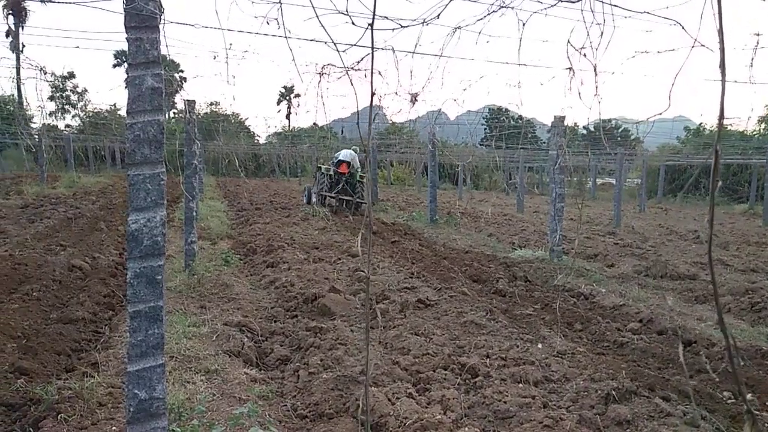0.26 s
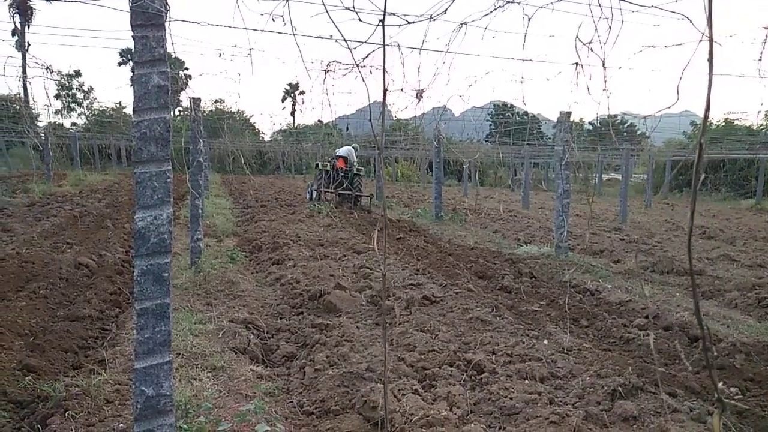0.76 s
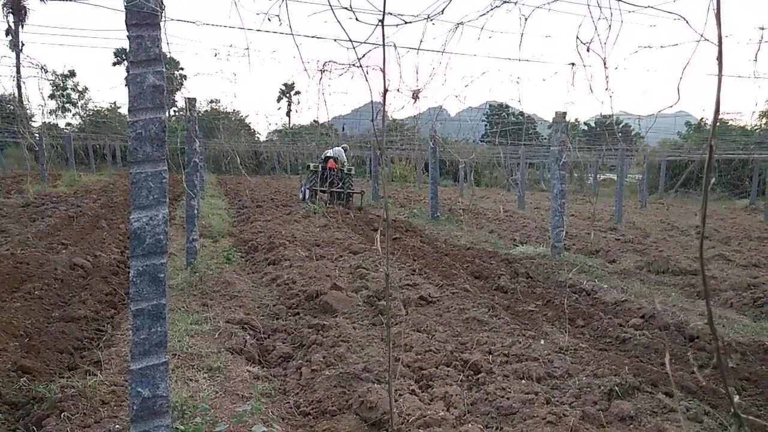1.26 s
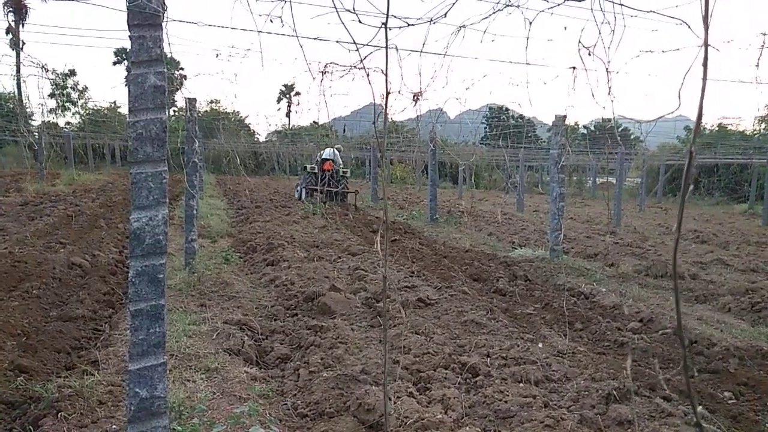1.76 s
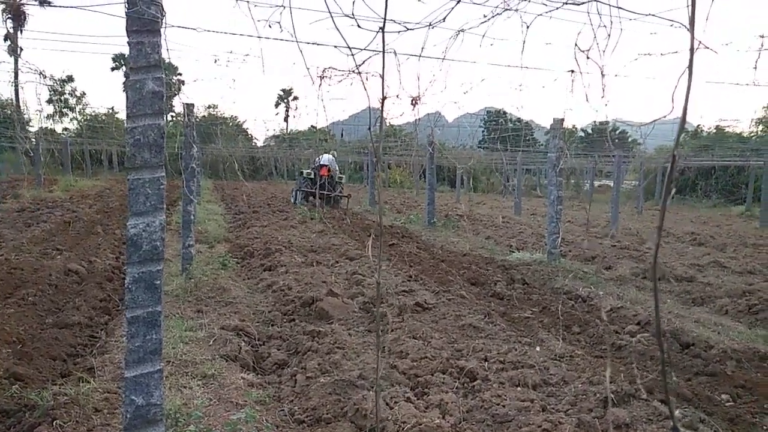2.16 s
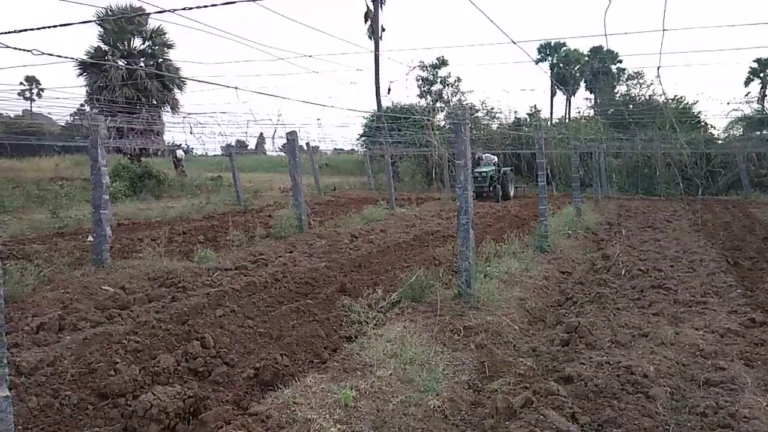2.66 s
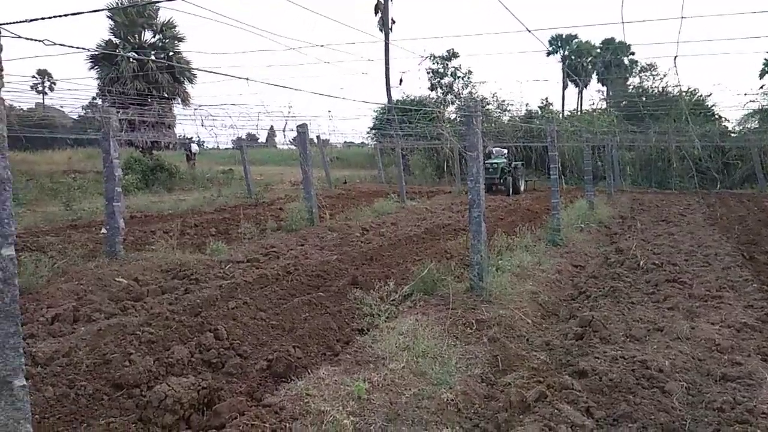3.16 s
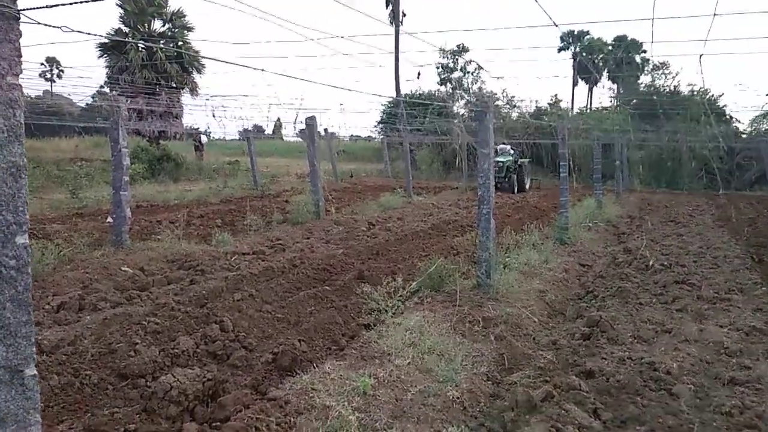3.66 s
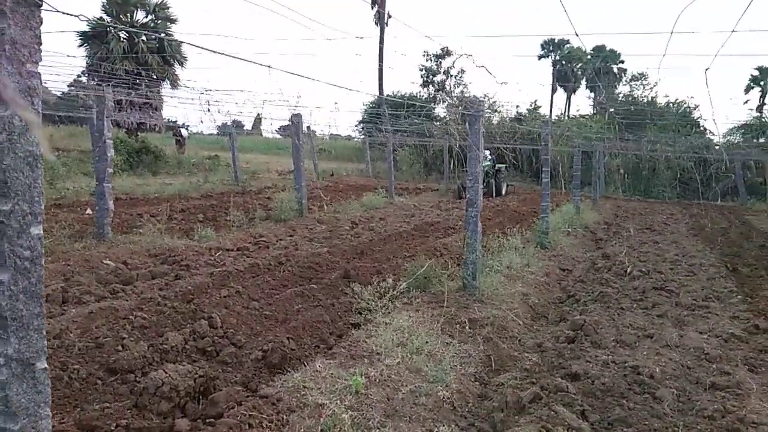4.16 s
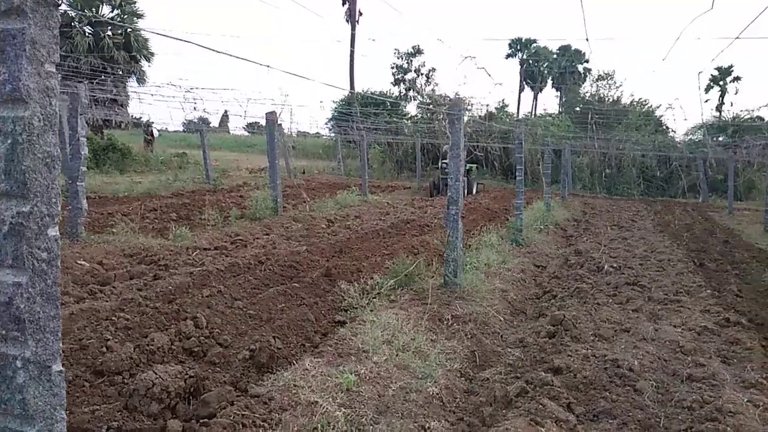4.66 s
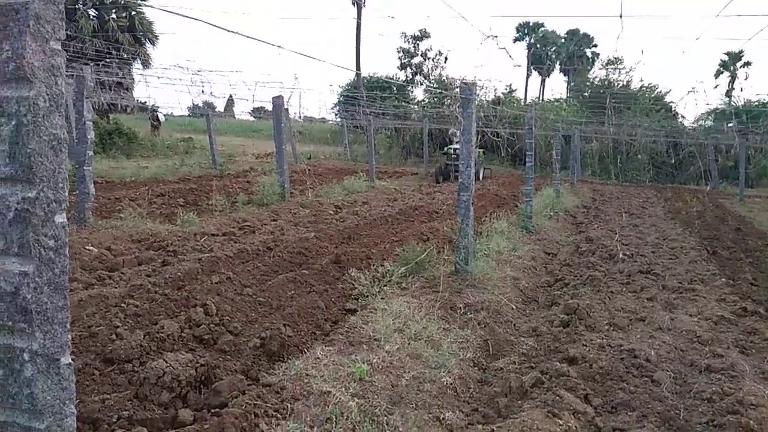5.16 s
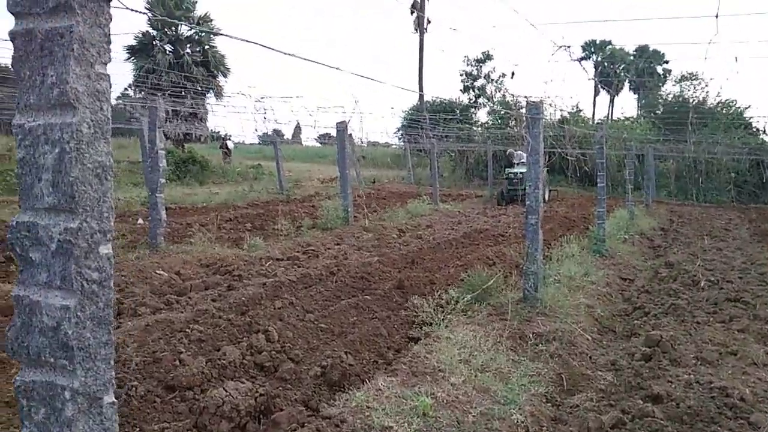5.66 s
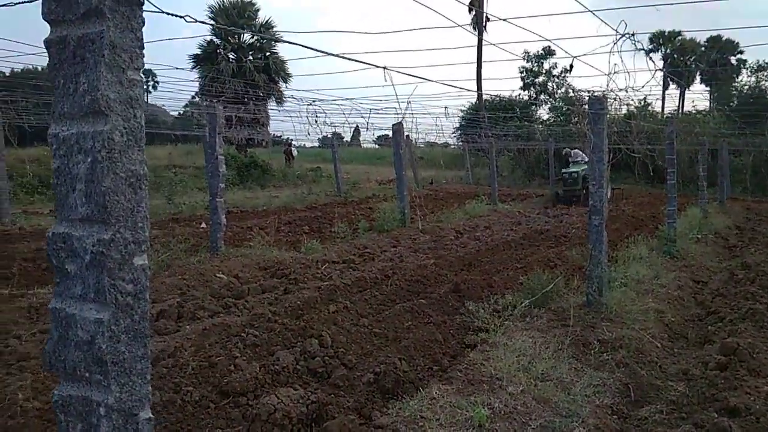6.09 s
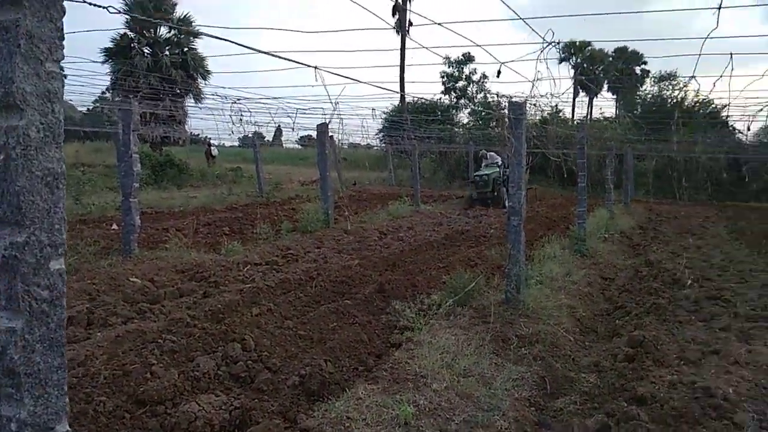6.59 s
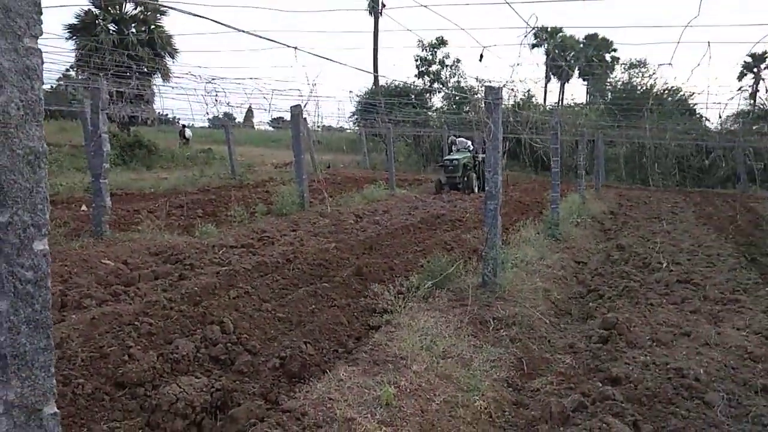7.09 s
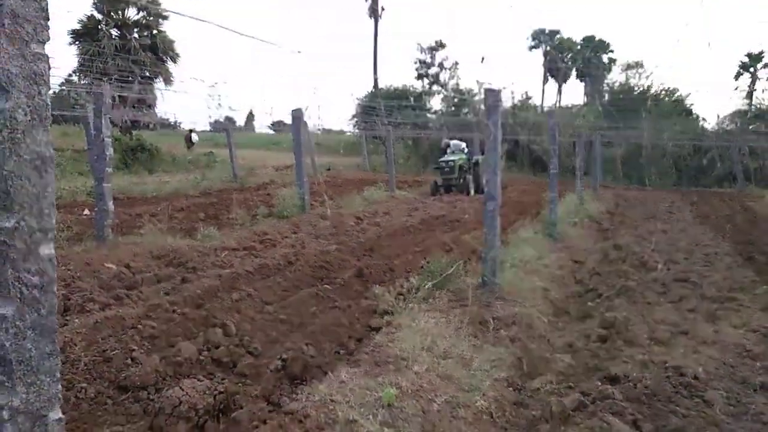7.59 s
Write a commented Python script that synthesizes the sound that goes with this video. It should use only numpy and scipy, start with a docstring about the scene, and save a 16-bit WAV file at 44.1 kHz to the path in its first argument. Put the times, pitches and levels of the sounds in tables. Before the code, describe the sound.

From 0 to 2 s a small diesel tractor putters at a distance in an open field: a fast, even beat of about 27 pulses a second, low thuds with light, dry cracks and mid-pitched metal clatter, the rasp swelling slightly as speed sags. At about 2.05 s the listening place cuts abruptly. The engine is suddenly far louder and slower, revving up from about 19 to 24 pulses a second, boomy, knocking on alternate turns, with bright spits and clanks, heaviest near 2.3 s. Around 3.2 s it drops sharply and keeps chugging much more quietly. A low bump sounds at 4.4 s, another at 4.7 s, and hissy metallic spits run from 4.6 to 5.5 s, with a sharp clack at 5.0 s. A smaller run comes near 6.4 s; ringing clanks continue from 6.7 s to the end near 7.8 s. Stereo leans left, with faint air and little reverberation.

```python
"""Small diesel tractor at work

A tractor pulls a cultivator across a field, heard from one spot and, after 2 s, from another.
Every crank turn sums low orders into a thud and gates noise into a bright rasp; part of a turn later
the engine block rings with a knock, hardest on firing turns, and noise bursts crack and clatter.
When the soil drags the crank down, the rasp grows; at the second spot sharp noise bursts spit in runs.
Short decaying rings make the clanks, bumps and clacks, over faint open air of coloured noise."""
import sys
import numpy as np
from scipy import signal
from scipy.fft import rfft, irfft, next_fast_len
from scipy.io import wavfile
from scipy.ndimage import uniform_filter1d

SR = 44100
rng = np.random.default_rng(int(sys.argv[2]) if len(sys.argv) > 2 else 0)


def store_wav(level_fs):
    """Save 16-bit WAV to argv[1]."""
    pcm = np.round(np.clip(np.atleast_2d(level_fs), -1, 1) * 32767)
    wavfile.write(sys.argv[1], SR, pcm.T.astype(np.int16))


N = 345303
T = np.arange(N) / SR
CUT_S = 2.045  # when the listening place moves to the second spot


def amp(db):
    """Decibels to gain."""
    return 10 ** (np.asarray(db) / 20)


def evened(x):
    """Scales to rms 1."""
    return x / np.sqrt(np.mean(x ** 2) + 1e-20)


def curve(rows, axis=1):
    """One column of a table, joined by straight lines in time."""
    columns = np.transpose(rows)
    return np.interp(T, columns[0], columns[axis])


def read(points, hz):
    """A spectrum, joined by straight lines over log frequency."""
    f, value = np.transpose(points)
    return np.interp(np.log(hz + 1), np.log(f + 1), value)


def panned(lean_db):
    """Left and right gains whose mean is 1, for a lean of left minus right in dB."""
    ratio = amp(np.atleast_1d(lean_db))
    return 2 * np.array([ratio, np.ones_like(ratio)]) / (1 + ratio)


def add(mix, start_s, sound):
    """Mixes a sound in at a time, cut off at the end of the mix."""
    part = mix[max(round(start_s * SR), 0):][:len(sound)]
    part += sound[:len(part)]


def wobble(hz):
    """Random wander of rms 1: a new value hz times a second, joined by straight lines."""
    values = rng.standard_normal(N // 8)
    return evened(np.interp(T * hz, np.arange(N // 8), values))


# How alike the sound is at the two microphones. Each row: frequency in Hz, likeness (held to 0..1).
LIKENESS = [(60, 6.5), (250, -0.4), (700, 3.5), (1400, 0.78), (2500, 0.58), (5000, 0.39), (15000, -0.14)]


def noise(colour, lean, gate=1):
    """Noise, let through by a gate and then coloured, partly alike at the two microphones."""
    size = next_fast_len(N + 4096, True)
    hz = np.fft.rfftfreq(size, 1 / SR)
    shared, other = rfft(rng.standard_normal((2, N)) * gate, size)
    same = np.clip(read(LIKENESS, hz), 0, 1)
    second = same * shared + np.sqrt(1 - same ** 2) * other
    pair = np.array([shared, second]) * panned(read(lean, hz))
    x = irfft(pair * amp(read(colour, hz)), size)[:, :N]
    return x / x.mean(0).std()


def swell(u):
    """A soft attack that peaks at 1 when u is 2, then dies."""
    u = np.maximum(u, 0)
    return (u / 2) ** 2 * np.exp(2 - u)


def ring(hz, swell_s):
    """One short ring of random phase, fullest after two swell times."""
    t = np.arange(0, 20 * swell_s, 1 / SR)
    return swell(t / swell_s) * np.sin(2 * np.pi * (hz * t + rng.random()))


def crank(speed, start):
    """Turns of the crankshaft so far: its speed summed over time."""
    return start + np.cumsum(curve(speed)) / SR


GOVERNOR_LAG_S, LOAD_BEND = 0.14, 0.7
FULL_SAG = 3.2  # turns a second below free speed


def load(speed, free_speed):
    """How hard the engine pulls, 0 to 1: soil drags the crank down and the governor adds fuel later."""
    sag = free_speed - np.interp(T - GOVERNOR_LAG_S, *np.transpose(speed))
    return np.clip(sag / FULL_SAG, 0, 1) ** LOAD_BEND


def strokes(turns, idle_db, scatter_db):
    """Strength of each turn: firing and idle turns alternate, idle ones offset by idle_db, all scattered."""
    index = np.floor(turns).astype(int)
    scatter = scatter_db * rng.standard_normal(256)[index % 256]
    return amp(idle_db * (index % 2) + scatter)


def strike(turns, rise, fall):
    """Once a turn, a rounded rise and a slower fall that runs on under the next, both in turns."""
    ages = turns % 1 + np.arange(3)[:, None]
    return ((1 - np.exp(-(ages / rise) ** 2)) * np.exp(-ages / fall)).sum(0)


def thud(turns, orders, level_db, lean_db, rebound, waver_db):
    """The low orders line up into one pressure dip a turn; a weaker dip follows 0.42 turn later."""
    def dip(phase):
        return -sum(amp(db) * np.cos(2 * np.pi * order * phase) for order, db in orders)
    pulse = dip(turns) + rebound * dip(turns - .42)
    return evened(pulse) * amp(level_db + waver_db * wobble(31.5)) * panned(lean_db)


def rasp(turns, colour, lean, bed, fall, again):
    """A bright noise rasp once a turn, and a softer one nearly half a turn later."""
    force = strokes(turns, 0, scatter_db=1.2)
    grain = amp(1.8 * wobble(1500))
    second = swell((turns - .36) % 1 / .085)
    shake = strike(turns, rise=0.099, fall=fall) + again * second
    return noise(colour, lean, (bed + force * shake) * grain)


# What the engine block rings with at each knock.
# Each row: pitch in Hz, relative level in dB, swell time in seconds.
BLOCK_MODES = [(749.7, 18.5, 0.0026), (843, 12, 0.0037), (920, 3.5, 0.0013), (1026, 1, 0.0084)]
BOUNCE_S, BOUNCE_DB = 0.0097, -6  # typical delay and level of the bounce after a blow
KNOCK_SCATTER_DB = .7


def knock(turns, modes, idle_db, detune, scatter_db):
    """Once a turn a blow rings the modes, idle turns offset by idle_db; a lighter bounce follows."""
    out = np.zeros(N)
    force = strokes(turns, idle_db, scatter_db)
    for at in np.flatnonzero(np.diff(np.floor(turns))) + 1:
        for hz, db, swell_s in modes:
            pitch, size, late, bounce = rng.standard_normal(4)
            pitch_hz = hz * (1 + detune * pitch)
            gain = force[at] * amp(db + .5 * size)
            bounce_gain = gain * amp(BOUNCE_DB + bounce)
            add(out, at / SR, gain * ring(pitch_hz, swell_s))
            add(out, at / SR + BOUNCE_S * np.exp(0.2474 * late), bounce_gain * ring(pitch_hz, swell_s))
    return evened(out)


# Spells in which a panel rings along with the knock.
# Each row: start in seconds, end in seconds, pitch in Hz, level in dB.
PANELS = [(0.0, 1.7, 1544, -77.5), (1.35, 1.54, 1498, -70), (1.44, 1.43, 758, -70), (2.3, 3, 1044, -64),
          (2.3, 3.25, 1555, -60.5), (4.2, 5.2, 1357, -76), (5.61, 6.22, 1080, -64.5),
          (5.8, 5.96, 1274, -70), (6.6, 7.8, 1602, -68), (6.6, 7.8, 2310, -70.5)]
PANEL_FADE_DB_PER_S, PANEL_SCATTER_DB = 62, 2
CLANK_DB, CLANK_SWELL_S, PANEL_SWELL_S = 10, 0.0012, 0.007  # short clank against the longer ring


def panels(turns):
    """Each panel rings once a turn, fading in and out around a spell: a short clank and a longer ring."""
    out = np.zeros(N)
    for start, end, hz, db in PANELS:
        outside_s = abs(T - np.clip(T, start, end))
        modes = [(hz, CLANK_DB, CLANK_SWELL_S), (hz, 0, PANEL_SWELL_S)]
        rings = knock(turns - .39, modes, idle_db=0.5, detune=0.0302, scatter_db=PANEL_SCATTER_DB)
        out += amp(db - PANEL_FADE_DB_PER_S * outside_s) * rings
    return out


SCATTER_DB, SCATTER_T60_S = -11, 0.19


def field(x, lean_db):
    """The direct sound, and a short scatter from the clods and posts that differs at each microphone."""
    t = T[:SR // 4]
    tail = rng.standard_normal((2, len(t))) * amp(-60 * t / SCATTER_T60_S) * (t > .006)
    tail /= np.linalg.norm(tail, axis=1, keepdims=True)
    scatter = signal.fftconvolve(x[None], tail, axes=1)[:, :N]
    return (x + amp(SCATTER_DB) * scatter) * panned(lean_db)


CRACK_SWELL_TURNS = .075


def crack(turns, colour, lean, idle_db):
    """Each blow opens with a round, wide crack of noise; idle turns are offset by idle_db."""
    burst = swell((turns % 1) / CRACK_SWELL_TURNS) * strokes(turns, idle_db, scatter_db=1.2)
    return noise(colour, lean, burst)


def clatter(turns, colour, lean, fall, bed, idle_db):
    """Loose metal chatters after each blow: grainy noise that dies away under the next."""
    burst = strike(turns, rise=.17, fall=fall) * strokes(turns, idle_db, scatter_db=1)
    grain = amp(1.66 * wobble(500))
    return noise(colour, lean, (bed + burst) * grain)


# Crank speed at the first spot. Each row: time in seconds, speed in turns a second.
SPEED_A = [(0.0, 26.69), (0.67, 27.31), (0.97, 26.62), (1.18, 27.8), (1.5, 25.84), (1.73, 27.77),
           (2.045, 26.84)]
# Make-up of the thud at the first spot. Each row: multiple of crank speed, relative level in dB.
THUD_A = [(1, -5), (2, -4), (3, 0), (4, 1), (5, -6), (6, -22), (7, -22), (8, -18), (9, -26), (10, -23),
          (11, -29), (12, -28)]
# Colours of clatter, rasp and crack at the first spot. Each row: frequency in Hz, relative dB per Hz.
CLATTER_A = [(120, -7), (220, -17), (360, 1.5), (450, -26), (610, 7.5), (680, -2), (740, 8.5), (950, -3),
             (1190, 9), (1290, -5), (1550, 2), (2200, -2), (2800, -4), (3300, -15.5), (3620, -6.5),
             (3950, -15.5), (5000, -19), (6200, -22), (9000, -35)]
RASP_COLOUR_A = [(3500, -7.5), (6200, -16.5), (7100, -4), (8200, -4.5), (9000, 2), (10100, 1.5),
                 (11200, -6), (12900, -27), (15800, -42)]
CRACK_COLOUR_A = [(400, -25), (700, 3), (1100, -2.5), (1500, 9), (1900, 3), (2500, 3), (3100, -4),
                  (3600, -7), (4500, -17), (9000, -30)]
# Lean between the microphones at the first spot. Each row: frequency in Hz, left minus right in dB.
LEAN_A = [(60, 3.5), (1200, 5), (1900, -3), (3000, 3), (4300, 17.5), (5300, 3), (8000, -1), (10500, 13),
          (13000, -2.5)]
FREE_SPEED_A = 27.65  # turns a second
THUD_A_DB, KNOCK_A_DB, CLATTER_A_DB, RASP_A_DB = -54.5, -78.5, -65, -72.5
CRACK_A_DB = -8  # against the clatter
LOAD_THUD_A_DB, LOAD_CLATTER_A_DB, LOAD_RASP_A_DB = 3, 0.5, 7.5  # what full load adds


def first_spot():
    """The engine runs fast, with a light, quick crack and clatter on every turn."""
    turns, pull = crank(SPEED_A, -.111), load(SPEED_A, FREE_SPEED_A)
    thud_db = THUD_A_DB + LOAD_THUD_A_DB * pull
    clatter_db = CLATTER_A_DB + LOAD_CLATTER_A_DB * pull
    rasp_db = RASP_A_DB + LOAD_RASP_A_DB * pull
    thuds = thud(turns, THUD_A, thud_db, lean_db=5.5, rebound=0.43, waver_db=0.5)
    rasps = rasp(turns + 0.28, RASP_COLOUR_A, LEAN_A, bed=0.47, fall=0.16, again=0.27)
    knocks = amp(KNOCK_A_DB) * knock(turns - .28, BLOCK_MODES, idle_db=-4.0, detune=0.062,
                                     scatter_db=KNOCK_SCATTER_DB)
    rings = field(knocks + panels(turns + 0.1212), lean_db=3.0)
    cracks = crack(turns - .28, CRACK_COLOUR_A, LEAN_A, idle_db=0.5)
    clatters = clatter(turns - .22, CLATTER_A, LEAN_A, fall=1.0, bed=0.55, idle_db=0.0)
    return (thuds + amp(rasp_db) * rasps + rings
            + amp(clatter_db + CRACK_A_DB) * cracks + amp(clatter_db) * clatters)


# Levels at the second spot: loud for a second, then it drops and stays nearly even.
# Each row: time in seconds, thud level in dB, clatter level in dB before load.
LOUDNESS_B = [(2.05, -40.5, -56.5), (2.15, -41, -51.5), (2.32, -34.5, -46.5), (2.5, -39, -51),
              (3.2, -37.5, -50), (3.27, -49.5, -61), (3.42, -54.5, -62), (4.69, -53.5, -58.5),
              (4.72, -44.5, -55.5), (4.75, -53.5, -57), (5.5, -53.5, -60.5), (6.6, -52.5, -58.5),
              (7.83, -52.5, -58)]


def loudness():
    """How loud the thud is at the second spot, 0 to 1."""
    loud_db = curve(LOUDNESS_B)
    return (loud_db - loud_db.min()) / np.ptp(loud_db)


# Colour of the open air. Each row: frequency in Hz, relative dB per Hz.
AIR = [(10, -0.5), (30, 4.5), (80, -6), (160, -4.5), (300, -17), (450, -23), (800, -53), (2000, -19.5),
       (4500, -54), (11000, -34), (16000, -45)]


def air():
    """A faint noise wash that rises and falls with the engine's loudness."""
    loud_db = np.where(T < CUT_S, THUD_A_DB, curve(LOUDNESS_B))
    return noise(AIR, LEAN_A) * amp(loud_db - 12.5 + 2.0 * wobble(6.8))


# Single hard clanks: mostly loose metal, plus some extra hard knocks of the engine near 800 Hz. # Each row:
# start in seconds, level in dB, pitch in Hz.
CLANKS = [(0.054, -60, 1470), (0.13, -54.5, 1490), (0.209, -58, 1636), (0.281, -58, 614),
          (0.353, -63, 1490), (0.788, -63, 1380), (1.168, -58, 1500), (1.456, -60, 1440), (1.5, -57, 1560),
          (1.577, -57.5, 1490), (2.174, -46, 1610), (2.273, -40, 900), (2.9, -44, 1480), (3.07, -43, 1444),
          (3.591, -59, 1400), (3.927, -61, 1450), (4.173, -54, 1350), (4.383, -48, 790), (4.514, -55, 1350),
          (4.604, -50, 1365), (4.874, -49, 1450), (4.961, -53, 1310), (5.048, -56, 1370), (5.09, -49, 770),
          (5.136, -55, 1380), (5.224, -53, 1360), (6.287, -49.5, 890), (6.679, -47.5, 1510),
          (6.717, -50, 1510), (6.932, -63, 2250), (7.185, -50.5, 2420), (7.186, -49, 1540),
          (7.267, -48, 2390), (7.271, -49.5, 1540), (7.353, -48.5, 1520), (7.394, -51.5, 803),
          (7.436, -54.5, 2340), (7.525, -61, 2300), (7.696, -55, 2400), (7.777, -45, 790),
          (7.778, -53, 2390)]
# What a clank rings with. Each row: multiple of its pitch, relative level in dB, swell time in seconds.
CLANK_MODES = [(1, 1.5, 0.0016), (.86, -13.5, 0.0019), (1.15, -14, 0.00077)]


def clanks():
    """Single hard blows: each rings a close cluster of modes and bounces once."""
    out = np.zeros(N)
    for start_s, db, hz in CLANKS:
        for ratio, mode_db, swell_s in CLANK_MODES:
            add(out, start_s, amp(db + mode_db) * ring(hz * ratio, swell_s))
            add(out, start_s + BOUNCE_S, amp(db + mode_db + BOUNCE_DB) * ring(hz * ratio, swell_s))
    return out


# Crank speed at the second spot. Each row: time in seconds, speed in turns a second.
SPEED_B = [(2.045, 19.39), (2.4, 24.51), (2.76, 23.12), (3.15, 23.01), (3.91, 24.1), (4.36, 23.62),
           (4.62, 21.9), (5.02, 23.09), (5.2, 22.69), (5.94, 24.29), (6.3, 22.64), (6.65, 23.88),
           (6.8, 23.02), (7.1, 24.02), (7.48, 23.12), (7.83, 24.37)]
# Make-up of the thud at the second spot. Each row: multiple of crank speed, relative level in dB.
THUD_B = [(1, -8.5), (2, -4.5), (3, 0), (4, .5), (5, -5.5), (6, -2.5), (7, -23), (8, -25), (9, -32),
          (10, -31), (11, -34), (12, -33)]
# Colours at the second spot: clatter, rasp, the lower body the rasp gains while loud, the crack that
# opens each blow, and the higher clack of the idle turns. Each row: frequency in Hz, relative dB per Hz.
CLATTER_B = [(150, 1), (280, -10.5), (480, -16.5), (600, -4.5), (760, 0.5), (1020, 1.5), (1200, -8),
             (1550, 5), (1950, -7), (2350, -6), (2700, -11.5), (3400, -8.5), (4200, -16), (5200, -11.5),
             (6500, -16), (9000, -32)]
RASP_COLOUR_B = [(2500, -37), (4500, -26), (6200, -20.5), (7300, -8.5), (8300, -9.5), (9300, -5),
                 (9900, -2.5), (10700, -6), (11600, -16.5), (13000, -17.5), (14500, -52), (16000, -73)]
RASP_BODY = [(1500, -13), (2700, -9.5), (3400, 4), (3800, 6), (4200, 0), (4800, 0.5), (5500, -6),
             (6200, -32), (9000, -30)]
CRACK_COLOUR_B = [(400, -25), (750, 10.5), (1000, 10), (1200, 2), (1550, 2.5), (1900, 2), (2350, 0.5),
                  (2700, -2), (3400, -2.5), (4300, -13.5), (6000, -11), (10000, -20)]
CLACK_COLOUR = [(900, -19), (1350, 8), (1600, 4.5), (1950, -6.5), (2380, 6), (2750, -28), (3500, -13),
                (6000, -30)]
# Levels of the knock and of the clack. Each row: time in seconds, level in dB.
KNOCK_B = [(2.05, -53), (2.43, -56), (2.55, -59.5), (2.7, -57.5), (2.77, -50), (3.12, -53.5), (3.2, -51.5),
           (3.46, -62), (3.88, -67), (4.2, -60), (4.56, -63), (4.74, -59), (4.83, -61), (5.05, -58),
           (5.36, -60), (5.45, -62), (6.2, -73.5), (6.55, -61.5), (6.8, -66), (6.98, -59.5), (7.3, -67.5),
           (7.8, -59)]
CLACK_B = [(2.05, -67.5), (2.6, -57), (3.17, -62.5), (3.35, -73), (4.3, -74.5), (4.9, -68.5), (5.6, -75.5),
           (6.3, -73.5), (6.7, -70), (7.25, -69.5), (7.8, -67)]
# Lean between the microphones at the second spot. Each row: frequency in Hz, left minus right in dB.
LEAN_B = [(60, 14), (700, 6.3), (1800, 0.36), (2300, 9.2), (2700, 0.83), (3300, 17.7), (4800, 2.6),
          (6500, 1.8), (9700, 20), (13000, 5.3), (16000, 3.6)]
FREE_SPEED_B = 23.24  # turns a second
RASP_FREE_DB, RASP_CEILING_DB = -14, -48  # running free, against the thud; and the upper limit
LOAD_RASP_B_DB, LOAD_CLATTER_B_DB = 10.5, 3.5  # what full load adds
CRACK_B_DB, CHATTER_DB = -9, -3.5  # crack and chatter against the clatter level
RASP_BODY_DB = -63.5  # at full loudness


def second_spot():
    """The engine labours more slowly: firing turns knock, idle turns clack; sagging speed feeds the rasp."""
    turns, pull = crank(SPEED_B, .21), load(SPEED_B, FREE_SPEED_B)
    thud_db = curve(LOUDNESS_B)
    clatter_db = curve(LOUDNESS_B, axis=2) + LOAD_CLATTER_B_DB * pull
    rasp_db = np.minimum(thud_db + RASP_FREE_DB + LOAD_RASP_B_DB * pull, RASP_CEILING_DB)
    thuds = thud(turns, THUD_B, thud_db, lean_db=8.0, rebound=0.36, waver_db=0.0)
    rasps = rasp(turns + 0.17, RASP_COLOUR_B, LEAN_B, bed=0.22, fall=0.15, again=0.17)
    body = rasp(turns + 0.13, RASP_BODY, LEAN_B, bed=0.22, fall=0.12, again=0.17)
    knocks = amp(curve(KNOCK_B)) * knock(turns - .355, BLOCK_MODES, idle_db=-11.5, detune=0.014,
                                         scatter_db=KNOCK_SCATTER_DB)
    rings = field(knocks + panels(turns), lean_db=5.0)
    cracks = crack(turns - .35, CRACK_COLOUR_B, LEAN_B, idle_db=-4.5)
    clacks = crack(turns - .39, CLACK_COLOUR, LEAN_B, idle_db=5)
    chatter = clatter(turns - .35, CLATTER_B, LEAN_B, fall=1.0, bed=0.32, idle_db=2.5)
    return (thuds + amp(rasp_db) * rasps + amp(RASP_BODY_DB) * loudness() ** 2 * body + rings
            + amp(clatter_db + CRACK_B_DB) * cracks + amp(curve(CLACK_B)) * clacks
            + amp(clatter_db + CHATTER_DB) * chatter)


# Sharp spits, in runs when the engine strains. Each row: start in seconds, level in dB.
SPITS = [(2.047, -39), (2.1, -40), (2.146, -39), (2.194, -41.5), (2.24, -39), (2.283, -41.5), (2.326, -46),
         (2.367, -43), (2.787, -47.5), (2.832, -47), (2.875, -47), (3.222, -46.5), (3.264, -55),
         (4.362, -60.5), (4.448, -58), (4.534, -58), (4.578, -51.5), (4.625, -45), (4.668, -42),
         (4.714, -41), (4.76, -43.5), (4.806, -45), (4.85, -49.5), (4.895, -51.5), (4.981, -63),
         (5.025, -59), (5.069, -59), (5.111, -50), (5.156, -48.5), (5.199, -46), (5.243, -50), (5.288, -57),
         (5.375, -55.5), (5.417, -56), (5.461, -53.5), (5.503, -45.5), (5.549, -58), (6.264, -61),
         (6.308, -54.5), (6.35, -51), (6.395, -48.5), (6.438, -48.5), (6.481, -53), (6.524, -65),
         (6.908, -59.5), (6.952, -61), (7.5, -61.5), (7.544, -60), (7.586, -58), (7.628, -47), (7.67, -62)]
# Colour of the spits. Each row: frequency in Hz, relative dB per Hz.
SPIT_COLOUR = [(1000, -9), (3000, -21.5), (5000, -13), (6500, -5), (7500, -1.5), (8300, -0.5), (9800, 9),
               (11200, 0), (12700, -5.5), (14000, -13.5), (16000, -15)]
SPIT_SWELL_S, SIZZLE_DB, SIZZLE_FADE_S = 0.0022, -9, .032


def spits():
    """A loose part strikes: a grainy, bright burst and a trailing sizzle."""
    gate, t = np.zeros(N), T[:SR // 5]
    sizzle = (1 - np.exp(-t / SPIT_SWELL_S)) * np.exp(-t / SIZZLE_FADE_S)
    shape = swell(t / SPIT_SWELL_S) + amp(SIZZLE_DB) * sizzle
    for start_s, db in SPITS:
        add(gate, start_s, amp(db) * shape)
    return gate * noise(SPIT_COLOUR, LEAN_B, amp(0.6 * wobble(1700)))


# Dull bumps and clacks. Each row: start in seconds, level in dB, pitch in Hz, swell time in seconds.
BUMPS = [(2.337, -31.5, 140, 0.002), (2.433, -36.5, 230, 0.0016), (4.357, -51, 288, 0.0016),
         (4.377, -55, 300, 0.0032), (4.396, -55, 290, 0.0023), (4.403, -42.5, 97, 0.0047),
         (4.413, -49, 260, 0.0012), (4.713, -35, 49.3, 0.0038), (4.719, -55, 250, 0.0011),
         (5.005, -37.5, 670, 0.00096), (5.008, -59.5, 467, 0.0017), (5.955, -50.5, 520, 0.00085),
         (6.102, -55.5, 458, 0.0012)]


def bumps():
    """Stray bumps and clacks: single short rings, well to the left."""
    dull = np.zeros(N)
    for start_s, db, hz, swell_s in BUMPS:
        add(dull, start_s, amp(db) * ring(hz, swell_s))
    return dull * panned(14)


# How far the colour drifts. Each row: frequency in Hz, rms drift in dB.
DRIFT = [(1500, 0), (2800, 1.8), (5000, 2.4), (7500, 1.6), (10000, 1.3), (14000, 1.8)]


def drifting(x):
    """The colour of the treble drifts in broad patches, smoothed random gains over time and pitch."""
    hz, _, z = signal.stft(x, SR, nperseg=512, noverlap=384)
    patches = rng.standard_normal(z.shape[1:])
    for _ in range(2):
        patches = uniform_filter1d(patches, size=5, axis=0)
        patches = uniform_filter1d(patches, size=36, axis=1)
    gain = amp(read(DRIFT, hz)[:, None] * evened(patches))
    gain /= np.sqrt(np.mean(gain ** 2, axis=1, keepdims=True))  # each band keeps its mean power
    return signal.istft(z * gain, SR, nperseg=512, noverlap=384)[1][:, :N]


RIGHT_LAG_SAMPLES = 3
LEAN_FIRST_DB, LEAN_LOUD_DB = 2, 4  # extra left lean: first spot, and second spot at its loudest


def scene():
    """One spot, then the other; from the second the tractor reaches the left microphone a little sooner."""
    left, right = second_spot()
    second = [left, np.roll(right, RIGHT_LAG_SAMPLES)]
    tractor = np.where(T < CUT_S, first_spot(), second)
    mix = drifting(tractor + spits()) + field(clanks(), lean_db=5) + bumps() + air()
    return mix * panned(np.where(T < CUT_S, LEAN_FIRST_DB, LEAN_LOUD_DB * loudness()))


EDGE_HZ = 15850


def record(dry):
    """A steep low-pass filter takes off everything above the edge."""
    low_pass = signal.firwin(511, EDGE_HZ, window=("kaiser", 9), fs=SR)
    return signal.oaconvolve(dry, low_pass[None], "same")


dry = scene()
out = record(dry)
store_wav(out)
```